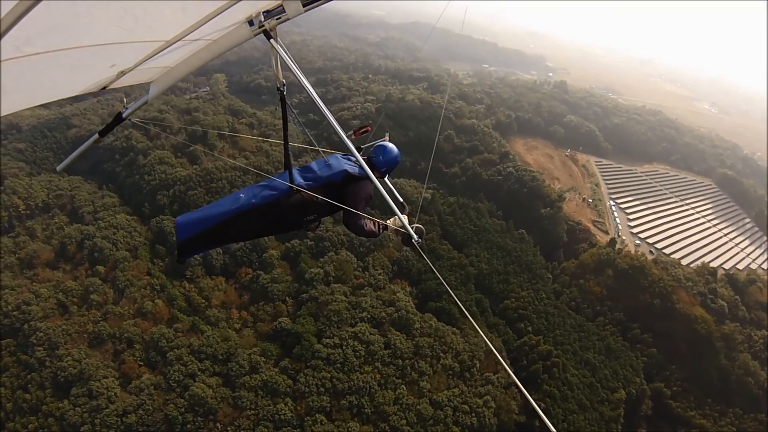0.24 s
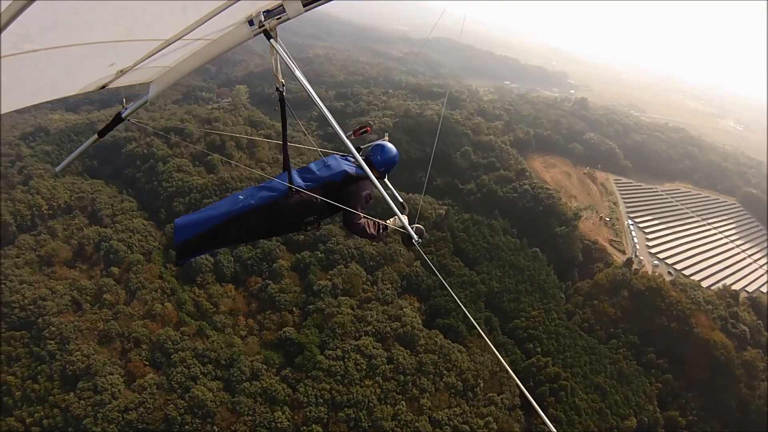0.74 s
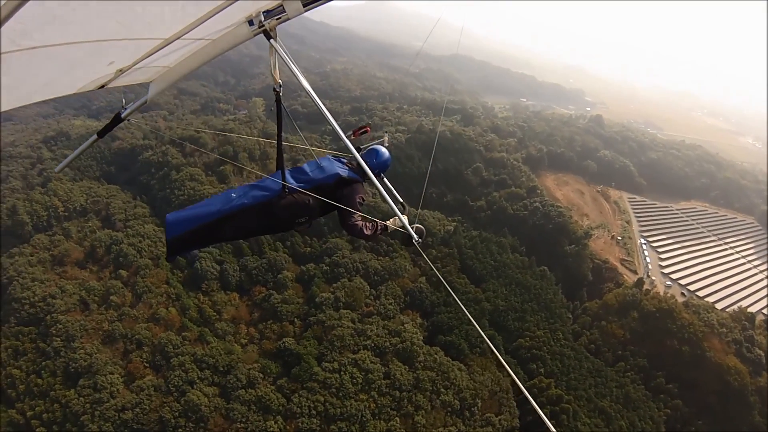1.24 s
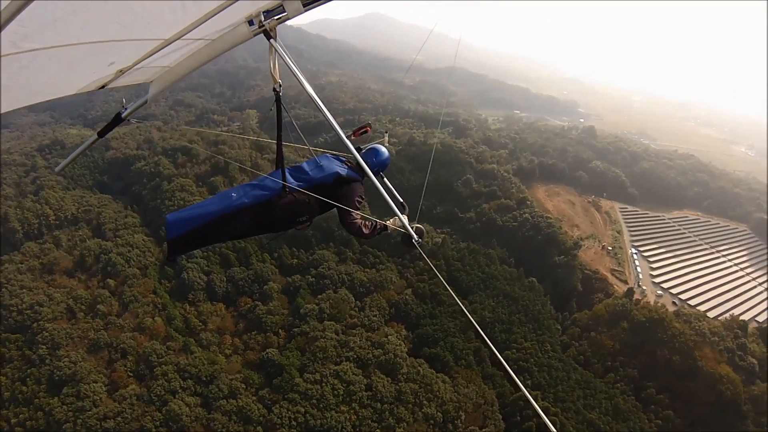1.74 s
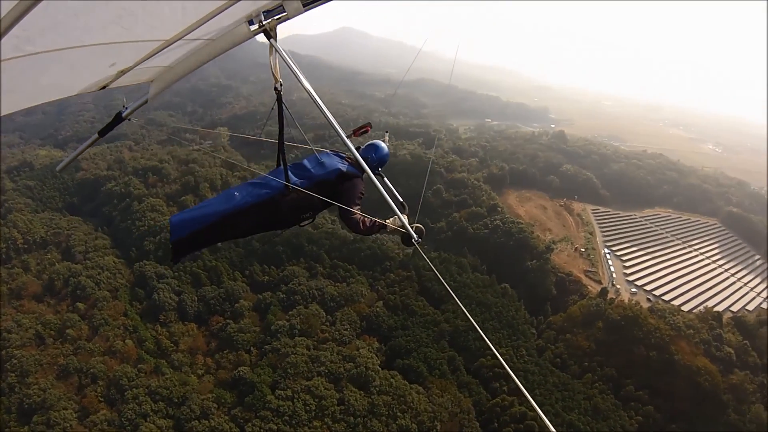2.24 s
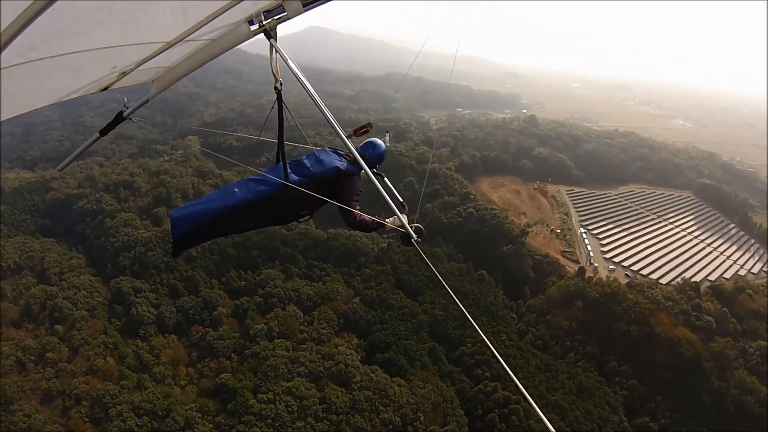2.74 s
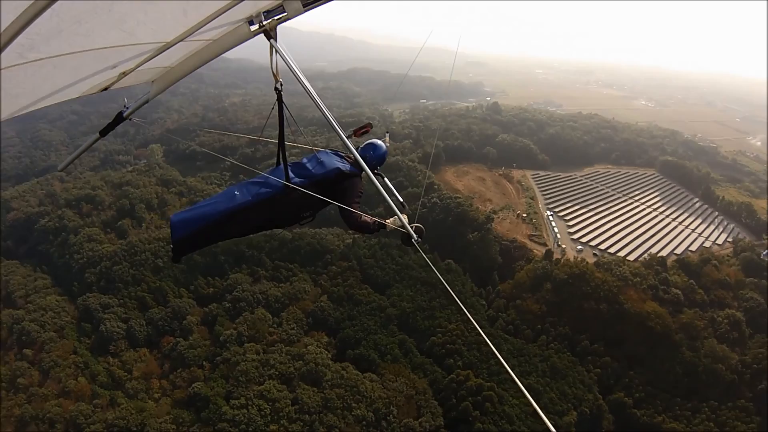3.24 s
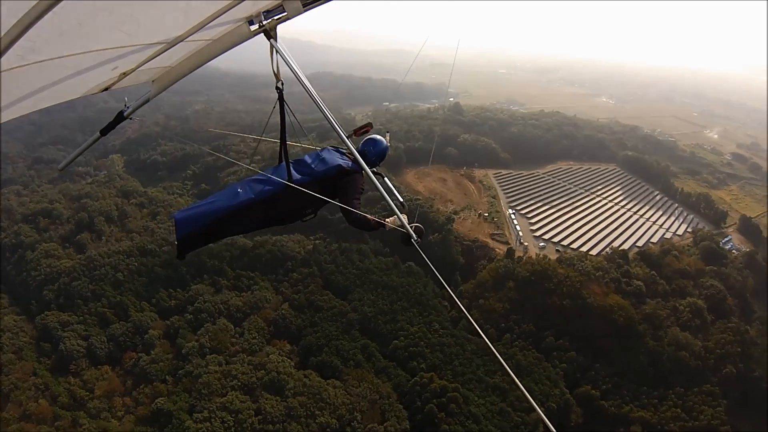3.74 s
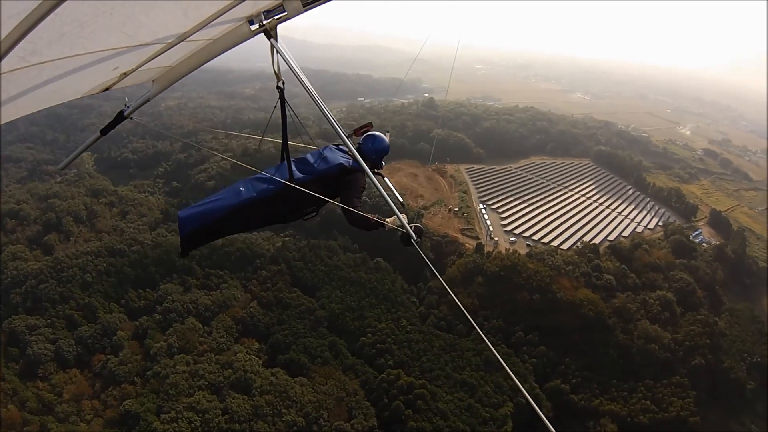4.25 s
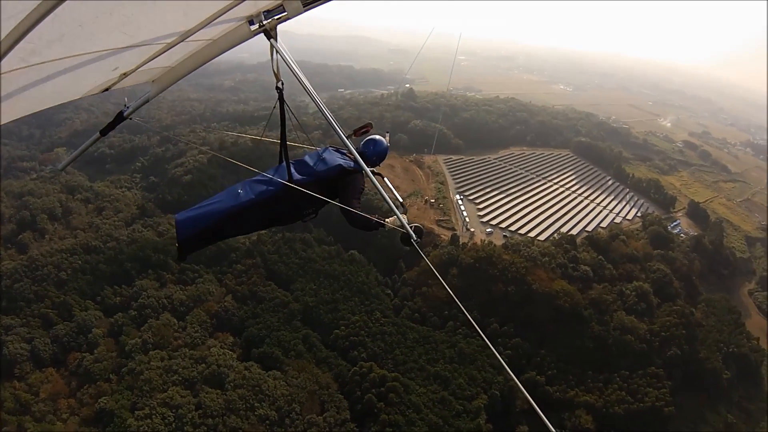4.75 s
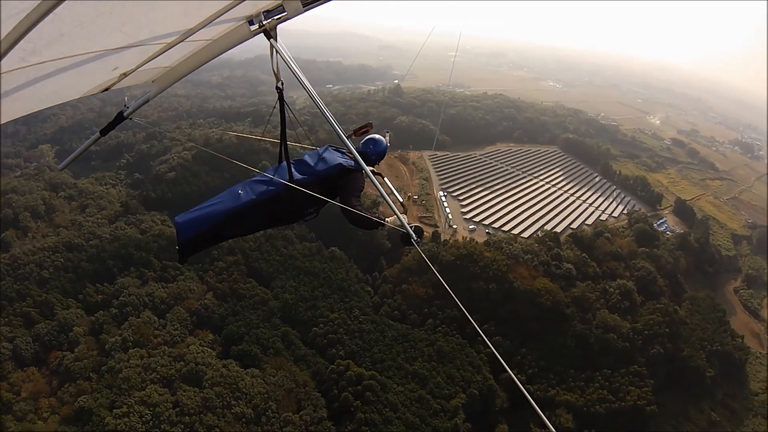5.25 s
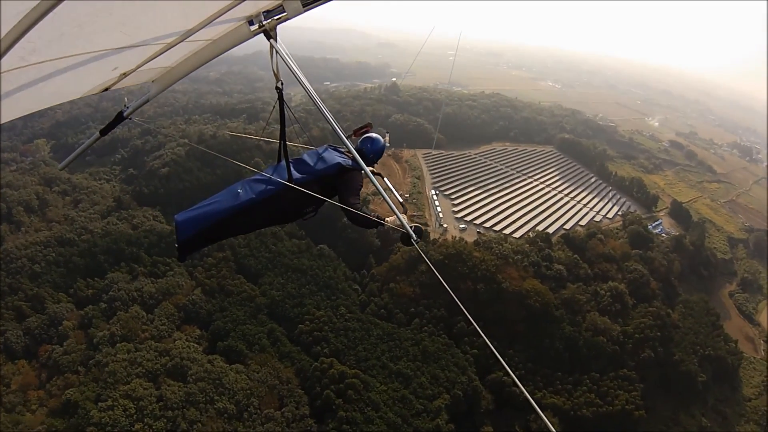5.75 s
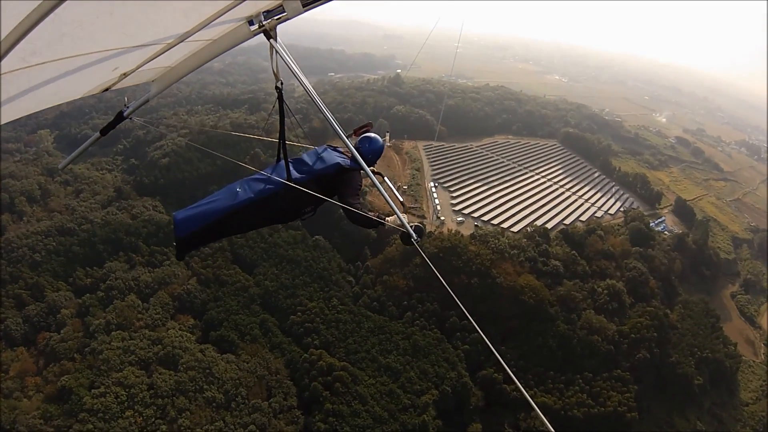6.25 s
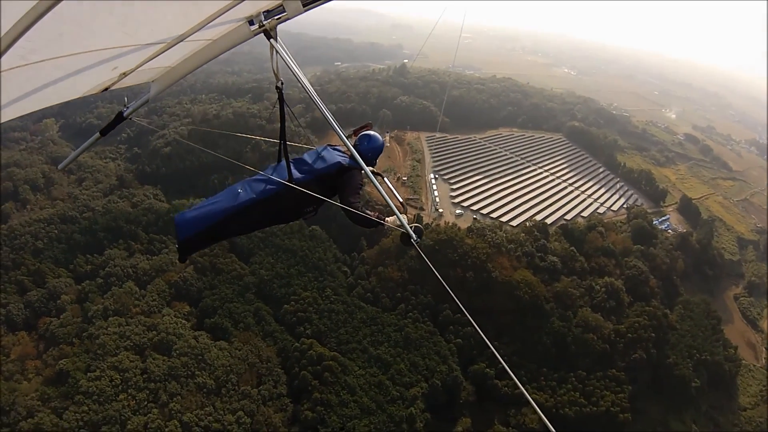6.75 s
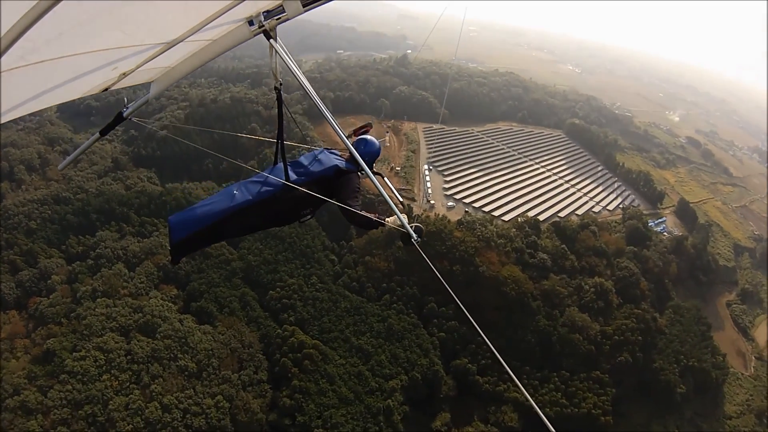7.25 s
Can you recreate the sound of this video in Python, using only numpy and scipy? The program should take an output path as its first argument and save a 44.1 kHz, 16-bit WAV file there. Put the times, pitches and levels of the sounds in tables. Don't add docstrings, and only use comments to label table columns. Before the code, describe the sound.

Close, overloaded wind noise on a hang glider in flight: low rumbling gusts that briefly let go and grip again, sharp thumps edged with crackle, densest at the start. A breathy hiss runs throughout, slowly changing colour, with a weak unsteady tone from a hollow tube and wires. Occasional faint sail rubs, batten clicks, metal ticks and tiny chirps come from the frame around the microphone.

```python
import sys
import numpy as np
from scipy import signal
from scipy.io import wavfile
from scipy.ndimage import uniform_filter1d

SR = 44100
rng = np.random.default_rng(int(sys.argv[2]) if len(sys.argv) > 2 else 0)


def bounce(signal):
    frames = np.transpose(np.atleast_2d(signal))
    limited = np.clip(frames, -1, 1)
    pcm = np.round(limited * 32767).astype(np.int16)
    wavfile.write(sys.argv[1], SR, pcm)


def convert_level_to_amplitude(level_db):
    exponent = np.asarray(level_db, float) / 20
    return 10 ** exponent


N = 330750


def evened(x):
    return x / np.sqrt(np.mean(x ** 2) + 1e-20)


def curve(rows):
    s, *columns = np.transpose(rows)
    return [np.interp(np.arange(N) / SR, s, c) for c in columns]


def add(mix, s, sound):
    part = mix[max(round(s * SR), 0):][:len(sound)]
    part += sound[:len(part)]


def swell(size):
    return evened(uniform_filter1d(uniform_filter1d(rng.standard_normal(N), size=size), size=size))


def resonate(x, hz, width):
    turn = np.exp(2j * np.pi * np.cumsum(hz * np.ones(len(x))) / SR)
    r = np.exp(-np.pi * width / SR)
    return 2 * (turn * signal.lfilter([1 - r], [1, -r], x / turn)).real


def resonate_twice(x, hz, width):
    return resonate(resonate(x, hz, width), hz, width)


def turbulence(spectrum, size, peaks=(), patchy_db=2., flicker_db=1.):
    frames, hz = 4 * N // size + 5, np.fft.rfftfreq(size, 1 / SR)
    a, b, patches = rng.standard_normal((frames, len(hz), 3)).T
    flicker = evened(uniform_filter1d(rng.standard_normal(frames), size=3))
    patches = uniform_filter1d(patches, size=9, axis=0)
    patches = evened(uniform_filter1d(patches, size=9, axis=1))
    f, db = np.transpose(spectrum)
    shape_db = np.interp(np.log(hz + 1), np.log(f + 1), db, left=-120, right=-120)
    shape_db += sum(lift / (1 + (2 * (hz - centre) / width) ** 2) for centre, width, lift in peaks)
    z = (a + 1j * b) * convert_level_to_amplitude(shape_db[:, None] + patchy_db * patches + flicker_db * flicker)
    return evened(signal.istft(z, nperseg=size, noverlap=size - size // 4)[1][:N])


def eddy_rows():
    # start_s, push (+) or suck (-) of full scale,
    # width_ms, gain_step_db
    buffets = [(.0304, -0.33, 3.1, -51.5), (.0855, -0.73, 2.4, -43), (.7305, .42, 3.5, -45),
               (.1817, 0.37, 7.4, -45), (.2842, -0.34, 4.6, -51), (.3742, 0.49, 4.8, -39),
               (.4513, -.41, 5.5, -46.5), (.4596, .4, 13, -45), (.5769, 0.5, 4.8, -40), (.713, .38, 5, -46),
               (.745, -.64, 3.8, -43), (.8455, 0.52, 3.6, -39), (.892, -0.31, 2.9, -42),
               (1.0352, -0.5, 3.8, -39), (1.117, -0.49, 4.1, -43), (1.127, .32, 4.2, -47),
               (1.2914, 0.38, 2.7, -43.5), (1.302, -.45, 8, -47), (1.7799, -.43, 4.2, -44.5),
               (1.8672, -0.47, 3.8, -41), (3.0322, .37, 8.8, -45), (4.4353, .28, 6.9, -51),
               (4.5529, .44, 5.3, -49.5), (5.1001, 0.37, 10, -46), (5.1878, -0.41, 5, -44),
               (5.301, -0.45, 6.7, -51), (5.5764, 0.49, 4.9, -39.5), (6.5098, .48, 5.1, -47),
               (7.3557, -.46, 3.4, -40.5), (7.3622, 0.44, 7.5, -44.5)]
    # start_s, push
    further_eddies = [(0.0755, .4), (0.2957, 0.42), (0.365, -.36), (0.502, -.36), (.1215, -.42), (0.7257, -.3),
                      (0.737, .33), (1.1777, -0.48), (1.5235, .39), (1.932, .41), (2.2734, -0.3), (2.6604, 0.36),
                      (2.813, .42), (3.064, -.36), (3.5062, 0.35), (3.6612, -.34), (3.6755, 0.43), (3.8113, -0.43),
                      (4.3426, .41), (4.6362, -.33), (4.8213, -0.44), (5.484, 0.27), (5.8378, -.38),
                      (5.9535, -0.34), (6.5474, .34), (6.576, .39), (6.775, .4), (6.976, -0.32), (7.206, -.43),
                      (7.499, 0.15)]
    further_width_ms, further_step_db = 4.5, -49.5
    return buffets + [(s, push, further_width_ms, further_step_db) for s, push in further_eddies]


def eddies():
    pulses, hold = np.zeros(N), np.zeros(N)
    first, last = -4, 8
    for s, push, width_ms, _ in eddy_rows():
        t = np.arange(first, last, 1000 / (width_ms * SR))
        start = s + first * width_ms / 1000
        skip = max(-round(start * SR), 0)
        lump = np.exp(-2.8 * t ** 2)
        lump -= 0.12 * np.exp(-1.1 * (t - 1.7) ** 2)
        lump -= 0.27 * np.exp(-1.1 * (t + 1.9) ** 2)
        add(pulses, start, (push * lump)[skip:])
        add(hold, start, np.exp(-.9 * t ** 2)[skip:])
    return pulses, np.clip(0.82 * hold, 0, 1)


def wind():
    # start_s, strength_db
    gusts = [(0.0, -22.5), (0.02, -17.5), (1.21, -17), (2.78, -23.5), (3.03, -18.5), (3.2, -22.5),
             (3.53, -19.5), (6.31, -18.5), (6.33, -24.5), (6.47, -18), (7.48, -20.5), (7.5, -20)]
    # start_s, depth_db
    lulls = [(.08, 6), (.14, 2), (.25, 1.5), (.81, 8.5), (1.48, 14), (2.19, 14), (2.59, 7.5), (2.71, 2),
             (3.2, 3.5), (3.76, 4), (3.99, 2.5), (5.39, 6.5), (6.33, 2.5), (7.08, 3), (7.33, 4)]
    # pitch_hz, density_db per Hz
    rumble_shape = [(4.7, -39), (8.0, -4), (27, 0.5), (51, 2.5), (112, -10), (220, -25), (290, -31.5),
                    (480, -120)]
    # pitch_hz, density_db per Hz
    roar_shape = [(65, -18), (110, -0.5), (461, -18.5), (619, -21.5), (831, -20), (1130, -39), (1500, -45),
                  (1950, -70.5), (3300, -120)]
    lull_s = 0.026
    roar_db, roar_follows, mean_gust_db = -30, .4, -19.

    gust_db, = curve(gusts)
    now = np.arange(0, N / SR, .002)
    lull_db = sum(depth_db * np.exp(-((now - s) / lull_s) ** 2) for s, depth_db in lulls)
    rumble_db = gust_db - np.interp(np.arange(N) / SR, now, lull_db)
    rumble = convert_level_to_amplitude(rumble_db + 2.5) * turbulence(rumble_shape, size=8192, patchy_db=-0.1, flicker_db=2.5)
    rumble = rumble * convert_level_to_amplitude(1.9 * swell(size=1300))
    rumble = 0.31 * np.tanh(rumble / 0.33)

    roar = turbulence(roar_shape, size=1024, patchy_db=1.5, flicker_db=0.9)
    roar = convert_level_to_amplitude(roar_db + roar_follows * (gust_db - mean_gust_db)) * roar
    pulses, hold = eddies()
    return rumble * (1 - hold) + pulses + roar


def hiss():
    # start_s, hiss_db, blown_db (how hard it blows across the cavities)
    air = [(0, -54, -4), (.6, -55, -5), (1., -54.5, -15), (1.34, -53.5, 1), (1.79, -56, -2.5),
           (2.31, -56.5, 4.5), (2.6, -56, -4.5), (3.5, -53, -0.5), (3.65, -54, -4.5), (4.04, -53.5, 4),
           (4.2, -53, -2), (4.9, -51.5, 2), (5.25, -52.5, -2.5), (5.71, -52.5, 6), (6.14, -53.5, -1),
           (6.49, -52, 4.5), (6.88, -53, -0.5), (7.5, -53.5, 2.5)]
    # pitch_hz, density_db per Hz
    hiss_shape = [(590, -29), (1000, 1), (1320, -8.5), (1780, -9), (2270, -15.5), (2870, -13.5),
                  (3320, -17.5), (4060, -18), (4710, -26.5), (5270, -26.5), (8000, -38), (10400, -68.5),
                  (17600, -120)]
    # centre_hz, width_hz, lift_db
    housing = [(1766, 220, 4), (2800, 520, 3)]
    # pitch_hz, density_db per Hz
    fizz_shape = [(3820, -30.5), (6500, -2.5), (9250, -5), (12300, -8), (14900, -13), (15400, -21.5),
                  (15600, -24.5)]
    fizz_db, cavity_swell_db = -73.5, 1

    hiss_db, blown_db = curve(air)
    second_db = -11 + 0.8 * blown_db + cavity_swell_db * swell(size=6000)
    third_db = -10 + blown_db + cavity_swell_db * swell(size=6000)
    third_hz = 5146 + 18 * np.arange(N) / SR
    body = turbulence(hiss_shape, size=512, peaks=housing, patchy_db=1.0, flicker_db=0.92)
    fizz = turbulence(fizz_shape, size=256, peaks=[(11800, 1200, 3)], patchy_db=1.5, flicker_db=1.3)
    flat = [(2000, 0), (9000, 0)]
    jets = [turbulence(flat, size=512, patchy_db=1.0, flicker_db=0.5) for _ in range(2)]
    second = evened(resonate_twice(jets[0], 4060.0, 810.0))
    third = evened(resonate_twice(jets[1], third_hz, 960.0))
    cavities = convert_level_to_amplitude(second_db) * second + convert_level_to_amplitude(third_db) * third
    return convert_level_to_amplitude(hiss_db + 3.0) * body + convert_level_to_amplitude(hiss_db - 2.0) * cavities + convert_level_to_amplitude(fizz_db + 2.0) * fizz


def tube():
    # start_s, pitch_hz, level_db
    blown = [(0, 890, -44), (.48, 890, -45.5), (.9, 875, -49), (1.13, 815, -47), (1.65, 837, -44),
             (2.3, 782, -49), (2.55, 805, -41), (2.9, 864, -46), (3.5, 872, -46), (4.6, 845, -42),
             (5.54, 883, -43), (6.18, 821, -44.5), (7.5, 859, -45.5)]
    hz, db = curve(blown)
    hz = hz * (1 + .008 * swell(size=3000))
    db = db + 1.6 * swell(size=1200)
    return convert_level_to_amplitude(db - 2.0) * evened(resonate_twice(rng.standard_normal(N), hz, 60.))


def sail_rubs():
    # start_s, length_s, level_db, centre_hz, width_hz
    rubs = [(2.427, 0.05, -42, 1030, 140), (2.426, 0.038, -43.5, 1280, 200), (2.428, .04, -42.5, 1260, 650),
            (2.46, 0.046, -50, 1100, 900), (2.445, .03, -65, 2830, 300), (.72, .03, -30.5, 450, 690),
            (1, .008, -49, 2600, 1200), (4.67, 0.016, -40, 1520, 180), (4.4, 0.098, -55.5, 1620, 300),
            (6.148, .025, -49, 2000, 1300), (0.27, 0.069, -51.5, 1600, 400)]
    out = np.zeros(N)
    for (s, length, db, hz, width), (noise, grip) in zip(rubs, rng.standard_normal((len(rubs), 2, 6000))):
        grain = noise * convert_level_to_amplitude(5.6 * evened(uniform_filter1d(grip, size=60)))
        u = np.arange(len(noise)) / (length * SR)
        envelope = np.clip(u / 0.095, 0, 1) * np.exp(-1.5 * u ** 2)
        add(out, s, convert_level_to_amplitude(db) * evened(resonate_twice(grain, hz, width)) * envelope)
    return out


def batten_snaps():
    # start_s, peak_db, ring_hz, upper_ring_db
    knocks = [(0.2855, -47.5, 3200, 1), (0.487, -52, 3000, 2), (3.775, -44, 4150, -5),
              (3.916, -49.5, 4200, 0), (4.378, -42.5, 2750, -14), (4.4363, -42, 4150, -4.5),
              (5.4847, -41.5, 4200, -4), (5.635, -47.5, 4200, 0), (6.3265, -47.5, 3500, 1),
              (6.4215, -46.5, 4150, -4), (7.0429, -46, 4100, -8), (7.2396, -57, 6940, -3),
              (6.6322, -59, 7500, -3)]
    out, t = np.zeros(N), np.arange(600) / SR
    for (s, db, hz, upper_db), noise in zip(knocks, rng.standard_normal((len(knocks), len(t)))):
        ring = np.sin(2 * np.pi * hz * t) + convert_level_to_amplitude(upper_db) * np.sin(2 * np.pi * 5350. * t)
        crackle = .5 * evened(resonate_twice(noise, hz, 2500.))
        decay = convert_level_to_amplitude(db + 4.0 - 60 * t / .012)
        add(out, s, decay * (ring + crackle) * np.clip(t / .0004, 0, 1))
    return out


def wires():
    # start_s, length_s, top_db, first_hz, last_hz
    songs = [
        (1.2, 1.35, -44, 742, 708),
        (1.15, 1.25, -57, 1035, 1115),
        (2.75, .7, -60, 1010, 1050),
        (3.9, 2.9, -51, 820, 775),
        (6.42, .18, -62, 4050, 4200),
        (6.38, .22, -59, 2550, 2650),
        (7.07, .2, -66, 3950, 4250),
        (3.15, .35, -66, 4250, 4280),
        (.62, .8, -68, 5250, 5300),
    ]
    widths_hz = [34.0, 11.0, 16.0, 45., 150., 130.0, 150., 150., 450.]
    out = np.zeros(N)
    for (s, length, top_db, first_hz, last_hz), width in zip(songs, widths_hz):
        t = np.arange(-.2, length, 1 / SR)
        u = np.clip(t / length, 0, 1)
        hz = first_hz + (last_hz - first_hz) * u
        db = top_db - 10 * (2 * u - 1) ** 2
        tone = resonate_twice(rng.standard_normal(len(t)), hz, width)[t >= 0]
        add(out, s, convert_level_to_amplitude(db[t >= 0]) * evened(tone) * signal.windows.tukey(len(tone), .15))
    return out


def fittings():
    # start_s, peak_db, low_ring_db, middle_ring_db, high_ring_hz
    ticks = [
        (1.3856, -46.5, 1, -7, 6330),
        (1.4465, -47.5, 1.5, -7.5, 6300),
        (2.6322, -46, -9, -12, 5600),
        (2.9942, -44.5, -5.5, -8.5, 6260),
        (4.673, -55, 8, -13, 3400),
    ]
    # pitch_hz, level_db, t60_s
    fitting = [
        (1425, 0, 0.0265),
        (2014, -1.5, 0.043),
        (3990, 7, 0.038),
    ]
    out, t = np.zeros(N), np.arange(3000) / SR
    for (s, db, low_db, mid_db, hz), turn in zip(ticks, rng.random((len(ticks), 6))):
        modes = [(f, d + lift, t60) for (f, d, t60), lift in zip(fitting, (low_db, low_db, mid_db))]
        modes += [(hz, -1., .014), (.92 * hz, -1.5, .014)]
        modes += [(4500., -2., .004)]
        ring = np.zeros(len(t))
        for (f, d, t60), phase in zip(modes, turn):
            ring += convert_level_to_amplitude(d - 60 * t / t60) * np.sin(2 * np.pi * (f * t + phase))
        add(out, s, convert_level_to_amplitude(db + 4.0) * ring * np.clip(t / 0.00054, 0, 1))
    return out


def squeaks():
    # start_s, length_s, top_db, first_hz, last_hz
    chirps = [
        (1.822, .024, -52.5, 4930, 5470),
        (1.805, .068, -69, 3740, 6650),
        (1.83, .025, -58, 5100, 5250),
        (2.105, .045, -65, 4800, 5350),
        (2.195, .04, -67, 5000, 5300),
        (4.524, .036, -54.5, 4900, 5500),
        (7.294, .012, -56, 4200, 4120),
        (7.318, .044, -62, 4900, 5900),
    ]
    # start_s, length_s, top_db, top_hz
    arches = [
        (1.545, .125, -68, 4380),
        (2.208, .15, -65.5, 4340),
    ]
    out = np.zeros(N)
    for s, length, top_db, hz, *last in chirps + arches:
        u = np.arange(0, length, 1 / SR) / length
        if last:
            hz = hz + (last[0] - hz) * u
            db = top_db - 7 * (1 - np.sin(np.pi * u))
        else:
            gap = np.interp(u, [0, .28, 1], [1, 0, 1])
            hz = hz * (1 - .15 * gap ** 1.1)
            db = top_db - 2.5 * u
        noises = rng.standard_normal((2, SR // 4))
        flutter, waver = (evened(uniform_filter1d(n, size=200))[:len(u)] for n in noises)
        tone = np.sin(2 * np.pi * np.cumsum(hz * (1 + .012 * waver)) / SR)
        add(out, s, convert_level_to_amplitude(db + 2.5 + 1.8 * flutter) * tone * signal.windows.tukey(len(u), .2))
    return out


def scene():
    return (wind() + hiss() + tube() + sail_rubs() + batten_snaps() + wires() + fittings() + squeaks())[None]


def gain_cuts():
    cut_share, longest_cut_ms = .72, 4.8
    recovery_s, rounding_hz = 0.023, 7400.0
    rows = eddy_rows()
    steps = np.zeros(N)
    for (s, _, width_ms, step_db), (pace, *luck) in zip(rows, rng.random((len(rows), 25))):
        cut_ms = min(cut_share * width_ms, longest_cut_ms)
        at_ms = np.cumsum(.25 + .16 * pace + .35 * np.array(luck) ** 2)
        at_ms -= at_ms[0]
        at = np.round((s + at_ms[at_ms < cut_ms] / 1000) * SR).astype(int)
        steps[np.minimum(at, N - 1)] += convert_level_to_amplitude(step_db + 17.5)
    cut = signal.lfilter([1], [1, -np.exp(-1 / (recovery_s * SR))], steps)
    soft = np.exp(-2 * np.pi * rounding_hz / SR)
    return np.exp(-signal.lfilter([1 - soft], [1, -soft], cut))


def low_pass(x):
    return signal.sosfilt(signal.butter(12, 15800, fs=SR, output="sos"), x)


def record(dry):
    mix = dry * gain_cuts()
    return low_pass(mix)


dry = scene()
out = record(dry)
bounce(out)
```